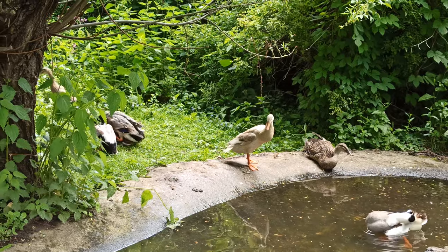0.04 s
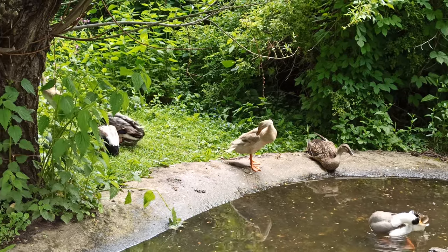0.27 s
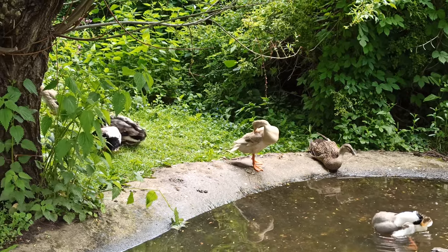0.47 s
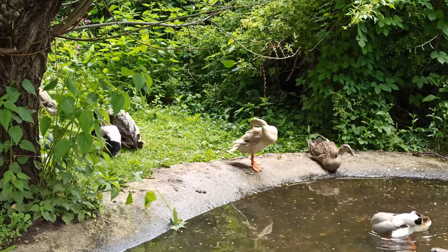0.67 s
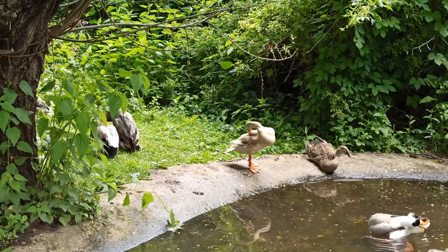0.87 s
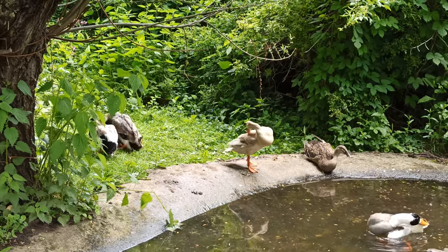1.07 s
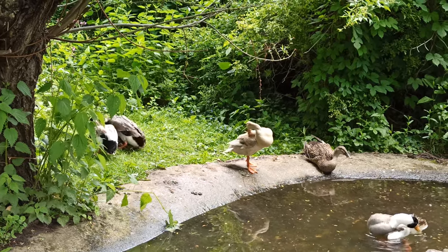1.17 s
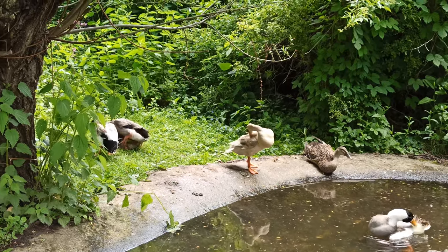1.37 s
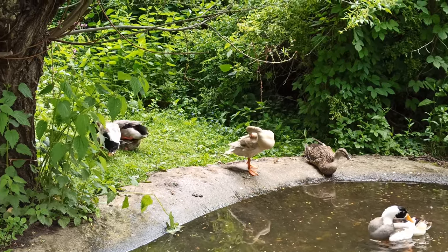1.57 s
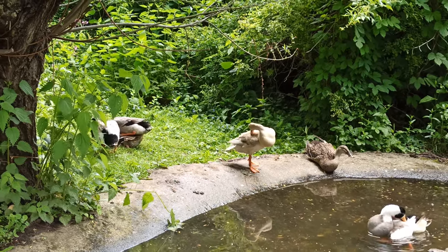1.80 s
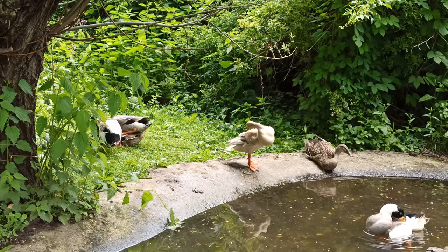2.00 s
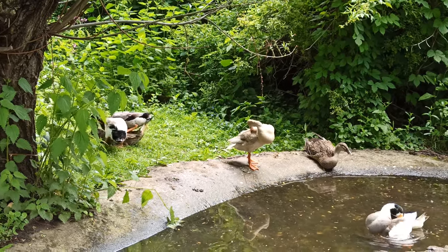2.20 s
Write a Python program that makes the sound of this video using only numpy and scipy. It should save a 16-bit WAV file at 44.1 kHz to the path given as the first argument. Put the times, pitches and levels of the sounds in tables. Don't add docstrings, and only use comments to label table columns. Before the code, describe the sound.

A single loud duck quack rises and cuts off early, followed by soft duck grunts. Thin bird whistles, tiny water ticks and a leafy wash surround it, with light wind bumping the outdoor stereo microphone.

```python
import sys
import numpy as np
from scipy import signal
from scipy.fft import rfft, irfft, next_fast_len
from scipy.io import wavfile
from scipy.ndimage import uniform_filter1d, map_coordinates

SR = 44100
rng = np.random.default_rng(int(sys.argv[2]) if len(sys.argv) > 2 else 0)


def dump(signal):
    limited = np.clip(np.atleast_2d(signal).T, -1, 1)
    pcm = np.round(limited * 32767).astype(np.int16)
    wavfile.write(sys.argv[1], SR, pcm)


def to_linear_factor(level_db):
    exponent = np.asarray(level_db, float) / 20
    return 10 ** exponent


N = 99225

BIRD_HOARSENESS = .5


def unit(x):
    return x / np.sqrt(np.mean(x ** 2) + 1e-20)


def along(points, hz):
    f, v = np.transpose(points)
    return np.interp(np.log(hz + 1), np.log(f + 1), v)


def over_time(points, t, **ends):
    return np.interp(t, *np.transpose(points), **ends)


def wobble(rate, size=N):
    knots = rng.standard_normal(int(size * rate / SR) + 4)
    return map_coordinates(knots, [np.arange(size) * rate / SR])


def add(out, s, x):
    out[round(s * SR):][:len(x)] += x


def tone(hz):
    return np.sin(2 * np.pi * np.cumsum(hz) / SR)


def filtered(x, response):
    m = next_fast_len(N + SR // 2)
    return irfft(rfft(x, m) * response(np.fft.rfftfreq(m, 1 / SR)), m)[..., :N]


def rush(spectrum, patchy_db):
    # hz, correlation (-1 to 1)
    likeness = [(100, 0.85), (290, 0.88), (640, -0.15), (1400, -0.36), (7000, 0.023), (13000, 0.21)]
    z = signal.stft(rng.standard_normal((2, N)), nperseg=512)[2]
    patches = uniform_filter1d(rng.standard_normal(z.shape[1:]), 6, 0)
    patches = unit(uniform_filter1d(patches, 10, 1))
    pair = signal.istft(z * to_linear_factor(patchy_db * patches), nperseg=512)[1][:, :N]

    def mid_and_side(hz):
        angle = np.arccos(np.clip(along(likeness, hz), -1, 1)) / 2
        return to_linear_factor(along(spectrum, hz)) * [np.cos(angle), np.sin(angle)]

    mid, side = filtered(pair, mid_and_side)
    return unit(np.array([mid + side, mid - side]))


def air():
    # hz, level_db (per Hz)
    far_colour = [(150, -7.5), (250, -3.5), (407, -7.5), (842, -4), (1020, -10.5), (1430, -11.5),
                  (8600, -21), (11200, -22), (18900, -120)]
    # start_s, level_db
    far_level = [(0, -51), (.5, -51), (.8, -53), (1.2, -56), (1.5, -55), (1.62, -57.5), (1.85, -53.5),
                 (2.05, -54.5), (2.25, -57)]
    # hz, level_db (per Hz)
    hiss_colour = [(11000, -33), (11600, -19), (14000, -16.5), (15800, -18.5)]
    level_db = over_time(far_level, np.arange(N) / SR)
    far = rush(far_colour, patchy_db=1.6)
    hiss = to_linear_factor([[-72.5], [-67]] + .7 * wobble(20)) * rush(hiss_colour, patchy_db=.6)
    return to_linear_factor(level_db + 0.99 * wobble(10.6) + [[-.6], [.6]]) * far + hiss


def wind():
    # hz, level_db (per Hz)
    rumble_colour = [(15, -95), (25, -26), (102, -2), (172, -8.5), (204, -7.5), (257, -26), (400, -14.5),
                     (520, -33), (880, -120)]
    # start_s, peak_db
    knocks = [(0.564, -42.5), (0.588, -45), (0.632, -38), (0.678, -38), (1.29, -39.5), (1.354, -45),
              (1.552, -48.5), (1.64, -43), (1.672, -41), (1.761, -33.5), (1.936, -46.5), (1.974, -38.5),
              (2.02, -43)]
    bumps, t = np.zeros(N + SR), np.arange(2200) / SR - .012
    for s, db in knocks:
        swing = np.exp(-(t / .0065) ** 2) * np.sin(2 * np.pi * rng.normal(112, 10) * t)
        add(bumps, s, to_linear_factor(db + 8) * swing)
    bumps = bumps[:N]
    lumps = to_linear_factor(1.57 * np.array([wobble(24.68), wobble(25.19)]) + 3.3 * wobble(2.86))
    rumble = to_linear_factor([[-53], [-56]]) * unit(lumps * rush(rumble_colour, patchy_db=-1.5))
    return rumble + np.array([bumps, to_linear_factor(-32.0) * np.roll(bumps, 300)])


def water():
    # start_s, peak_db, lower_ring_db
    ticks = [(.159, -42.5, 8), (.58, -63, 8), (.596, -62, 6), (.72, -60, -4), (.842, -59, -4),
             (.868, -62, 6), (1.085, -60, 8), (1.19, -62, 3), (1.491, -52, -6), (1.687, -58, -2),
             (1.791, -53, -8), (1.805, -56, -10), (1.818, -57, -10)]
    # start_s, pitch_hz, level_db
    drips = [
        (.0635, 2050, -52),
        (.0745, 2000, -51),
        (.084, 1750, -54),
        (1.793, 2000, -52),
        (1.81, 2300, -52),
        (1.825, 2400, -56),
        (1.883, 2200, -56),
    ]
    out, t = np.zeros(N), np.arange(900) / SR
    for s, db, low_db in ticks:
        fade = to_linear_factor(db - 60 * t / .01) * (1 - np.exp(-t / .0003))
        spray = 2.8 * rng.standard_normal(900) * np.sin(2 * np.pi * 13500 * t)
        ring = to_linear_factor(low_db) * np.sin(2 * np.pi * 8000 * t)
        add(out, s, fade * (spray + ring))
    out = filtered(out, lambda hz: 1 / (1 + (5500 / (hz + 1)) ** 8))
    for s, hz, db in drips:
        fade = to_linear_factor(db - 60 * t / 0.041) * (1 - np.exp(-t / 0.00033))
        add(out, s, fade * np.sin(2 * np.pi * hz * t * (1 + 14 * t)))
    return out


def warbler():
    # start_s, level_db
    songs = [
        (.978, -50),
        (1.966, -54),
    ]
    # start_s, pitch_hz, level_db
    warble = [(0, 3500, -20), (.007, 4000, -2), (.015, 4100, 0), (.02, 4450, -9), (.025, 4000, -3),
              (.032, 3650, -3), (.039, 3550, -14), (.046, 2900, -14), (.053, 3800, -10), (.06, 3500, -18),
              (.07, 3000, -13), (.078, 2800, -24)]
    out = np.zeros(N)
    s, hz, db = np.transpose(warble)
    t = np.arange(round(s[-1] * SR)) / SR
    for start, level_db in songs:
        pitch = uniform_filter1d(np.interp(t, s, hz), size=150)
        hoarse = 1 + BIRD_HOARSENESS * wobble(500, size=len(t))
        add(out, start, to_linear_factor(level_db + np.interp(t, s, db)) * hoarse * tone(pitch))
    return out


def whistles():
    # start_s, length_s, from_hz, to_hz, level_db
    glides = [(0.17, 0.07, 7250, 6900, -55), (.232, .04, 6750, 6650, -50),
              (0.222, 0.055, 8250, 7750, -58.5), (.268, .05, 7480, 7450, -57), (0.27, .03, 7250, 7050, -51),
              (0.325, .12, 6830, 6830, -45.5), (0.311, .07, 6380, 6500, -46.5),
              (.37, .085, 6600, 6250, -42), (0.37, .016, 7900, 7850, -47), (0.4, 0.06, 7520, 7480, -41),
              (0.45, 0.05, 7380, 7300, -56), (.49, .07, 7500, 7450, -71), (.465, .075, 6900, 6300, -53),
              (0.605, 0.048, 6450, 5500, -49.5), (0.606, 0.035, 7520, 7480, -52.5),
              (0.62, 0.02, 7100, 6950, -57), (0.6, 0.07, 6800, 6700, -50), (0.66, .03, 6600, 6350, -52.5),
              (1.47, 0.06, 8400, 8250, -75), (1.535, 0.085, 7950, 7400, -64),
              (1.496, 0.115, 7150, 6550, -59.5), (1.505, .06, 7400, 6950, -72),
              (1.621, 0.05, 7620, 7500, -65.5), (1.633, 0.073, 7020, 6900, -65),
              (1.711, 0.09, 6800, 6300, -55.5), (1.716, 0.11, 7650, 7450, -63),
              (1.728, .03, 7900, 7750, -69), (1.84, 0.094, 6700, 6450, -57.5),
              (1.872, 0.075, 7650, 7330, -62.5), (0.633, 0.073, 1420, 1420, -56),
              (1.565, 0.046, 3073, 3100, -60), (1.39, 0.1, 1600, 1560, -64.5),
              (1.395, .11, 2120, 1900, -63), (1.455, 0.077, 2670, 2800, -65),
              (2.12, .12, 150.7, 209.6, -54)]
    flutter_db, flutter_hz = 2.5, 35
    out = np.zeros(N)
    for s, length, from_hz, to_hz, db in glides:
        n = round(length * SR)
        u = np.arange(n) / n
        high = from_hz / 7000
        hz = from_hz + (to_hz - from_hz) * u + flutter_hz * high * wobble(207, size=n)
        shape = np.sin(np.pi * u) ** .6 * (1 + BIRD_HOARSENESS * high * wobble(900, size=n))
        level = to_linear_factor(db + high * flutter_db * wobble(108.4, size=n))
        add(out, s, level * shape * tone(hz))
    return out


def throat(x, peaks):
    def response(f):
        total = 0
        for k, (centre, width, db) in enumerate(peaks):
            damping = 1j * f * width
            total = total + (-1) ** k * to_linear_factor(db / 2) * damping / (centre * centre - f * f + damping)
        return total ** 2

    return filtered(x, response)


def pulses(rate_hz, rough, on):
    limp, jitter = .012, .16
    alternate_db, scatter_db, third_db = 1.1, 5.5, 7
    phase = np.cumsum(rate_hz * on) / SR
    at = np.flatnonzero(np.diff(np.floor(phase)) > 0)
    k, chance = np.arange(len(at)), rng.standard_normal((400, 2))[:len(at)]
    uneven, pair = rough[at] > .1, (-1.) ** k
    shift = (limp * pair + jitter * rough[at] * chance[:, 0]) * SR / rate_hz[at] * uneven
    size_db = rough[at] * (scatter_db * chance[:, 1] + third_db * (k % 3 == 0))
    x = np.zeros(N)
    x[at + np.round(shift).astype(int)] = to_linear_factor(size_db + alternate_db * pair * uneven)
    breath = rng.standard_normal(N) * np.exp(-3 * (phase % 1)) * on
    return x * np.sqrt(SR / rate_hz) + .9 * rough * breath, phase


def grunts():
    # start_s, length_s, pulse_rate_hz, level_db
    mutters = [
        (0.095, 0.045, 182, -52.5),
        (1.038, 0.07, 186.6, -54),
        (1.275, 0.064, 189.3, -51.5),
    ]
    # centre_hz, width_hz, level_db
    still_beak = [(366, 57, -8.5), (1149, 560, -13), (1480, 310, -3), (2235, 140, -16.5)]
    out, t = np.zeros(N), np.arange(N) / SR
    for s, length, hz, db in mutters:
        on = (t > s) & (t < s + length)
        arch = np.sin(np.pi * np.clip((t - s) / length, 0, 1) ** .8) ** 1.5
        x = pulses(np.full(N, hz), np.full(N, .2), on)[0] * arch
        out += to_linear_factor(db) * unit(throat(x, still_beak)) * np.sqrt(on.mean())
    return out


def quack():
    # start_s, pulse_rate_hz, level_db, beak_opening (0-1)
    course = [
        (0.1688, 146.4, -45, 0),
        (0.202, 155.5, -35.5, 0.28),
        (0.229, 182.7, -34.5, 0.22),
        (0.242, 203.9, -33, 0.36),
        (0.262, 257.6, -33.5, 0.66),
        (0.327, 277.8, -27.5, 0.78),
        (0.362, 290.9, -23, 0.92),
        (0.413, 288.6, -25, 0.9),
        (0.444, 288, -53.5, 0.71),
    ]
    # centre_hz, width_hz, level_db
    shut = [(607, 410, -9), (1080, 600, 10.5), (1500, 850, 2), (2100, 600, -26)]
    half_open = [(662, 170, -2.5), (975, 120, 12), (1375, 300, 13), (1920, 1020, 1.5)]
    wide_open = [(700, 160, -40), (993, 49, -3.5), (1503, 255, 3.5), (2060, 230, 10.5), (2445, 420, -3)]
    # centre_hz, width_hz, level_db
    rasp_bands = [(3150, 500, -17), (4130, 640, 0), (5350, 600, -7), (7600, 1550, -18)]
    # start_s, level_db
    rasp_level = [(.2, -75), (.246, -57), (.256, -41), (.3, -44), (.35, -44), (.375, -41), (.415, -43),
                  (.45, -48), (.48, -65)]
    # start_s, roughness (0-1)
    roughness = [(.22, .06), (.25, .45), (.325, .5), (.35, .16), (.41, .22), (.43, .6)]
    # multiple (of the pulse rate), level_db, growth (power of the opening)
    chest_lines = [(1, -16, 0.5), (2, -26, -1.5), (2.5, -28, -1), (3.5, -17.5, 1)]
    s, *cols = np.transpose(course)
    t = np.arange(N) / SR
    hz, db, opening = (np.interp(t, s, c) for c in cols)
    on = (t > s[0]) & (t < s[-1])
    x, phase = pulses(hz, over_time(roughness, t), on)

    step = 2 * np.clip(opening, 0, 1)
    voice = np.zeros(N)
    for k, beak in enumerate([shut, half_open, wide_open]):
        voice += np.clip(1 - abs(step - k), 0, 1) * unit(throat(x, beak))
    catch = to_linear_factor(-12 * np.exp(-((t - .38) / .003) ** 2))
    voice *= to_linear_factor(db) * np.sqrt(on.mean()) * catch

    hum = np.zeros(N)
    for multiple, line_db, growth in chest_lines:
        hum += to_linear_factor(line_db) * (0.16 + step / 2) ** growth * np.sin(2 * np.pi * multiple * phase)
    hum_db = np.interp(t - 0.0077, s, cols[1])
    hum *= on * to_linear_factor(1.7 * wobble(59)) * to_linear_factor(hum_db)

    breath = 1.05 * rng.standard_normal(N) * (1 + ~on)
    gated = (x + breath) * to_linear_factor(0.95 * wobble(68.4)) * (abs(t - .33) < .16)
    rasp = unit(throat(gated, rasp_bands)) * np.sqrt(.32 * SR / N)
    rasp *= to_linear_factor(over_time(rasp_level, t, left=-120, right=-120))
    return voice + hum + rasp


def bushes(x, t60s):
    hz, t, z = signal.stft(rng.standard_normal((2, SR // 2)), SR, nperseg=256)
    tail = signal.istft(z * to_linear_factor(-60 * t / along(t60s, hz)[:, None]), SR, nperseg=256)[1]
    late = np.pad(x, (300, 0))[None]
    return signal.fftconvolve(late, tail / np.linalg.norm(tail[0]), axes=1)[:, :N]


def placed(x, left_db, lead_s):
    half = np.array([[.5], [-.5]])
    return filtered(x, lambda hz: to_linear_factor(half * left_db(hz)) * np.exp(2j * np.pi * hz * half * lead_s))


def scene():
    # hz, left_over_right_db
    duck_side = [(300, -1), (800, -1), (1300, 4), (2400, 7), (4400, -12.5)]
    # hz, t60_s
    duck_decay = [(200, 0.89), (2000, 0.76), (8000, 0.6)]
    song_decay = [(3000, .2), (6000, .25), (8000, .33)]
    ducks, high, near, drops = quack() + grunts(), whistles(), warbler(), water()
    mix = placed(ducks, lambda hz: along(duck_side, hz), lead_s=.00008)
    mix = mix + to_linear_factor(-18.5) * bushes(ducks, duck_decay)
    mix = mix + placed(high, lambda hz: -2.5, lead_s=-0.00011) + to_linear_factor(-3) * bushes(high, song_decay)
    mix = mix + placed(near, lambda hz: -4, lead_s=-0.0000089) + to_linear_factor(-1.5) * bushes(near, song_decay)
    mix = mix + placed(drops, lambda hz: -6.5, lead_s=0) + to_linear_factor(-8) * bushes(drops, song_decay)
    return mix + wind() + air()


def band_limit(x):
    return signal.sosfilt(signal.butter(12, 16610, fs=SR, output="sos"), x)


def record(dry):
    # hz, gain_db
    colour = [(30, -18.5), (70, 2.5), (4700, 1.5), (5200, -4.5), (5900, 1.5), (6200, 5)]

    def response(hz):
        gap = (hz > 8640) & (hz < 11600)
        return to_linear_factor(along(colour, hz) - 30 * gap) * (hz < 15830)

    return band_limit(filtered(dry, response))


dry = scene()
out = record(dry)
dump(out)
```